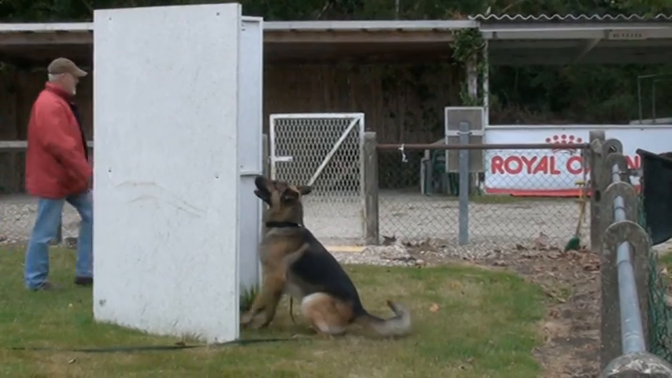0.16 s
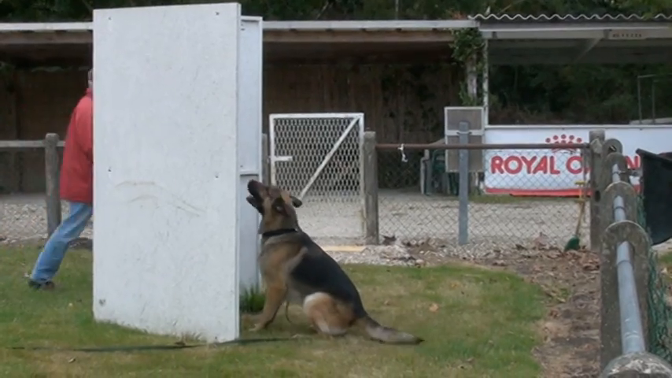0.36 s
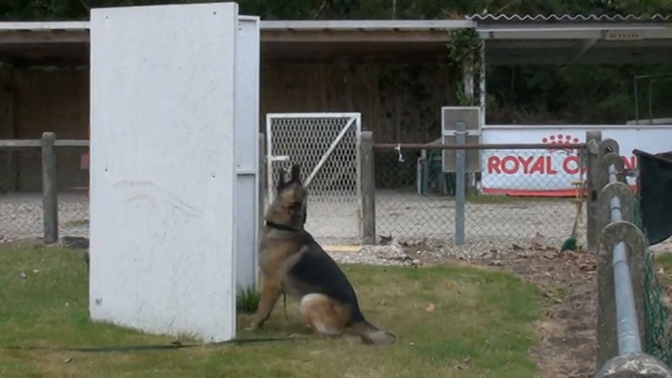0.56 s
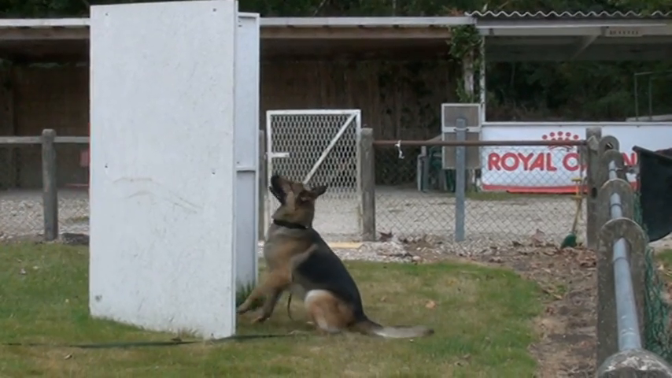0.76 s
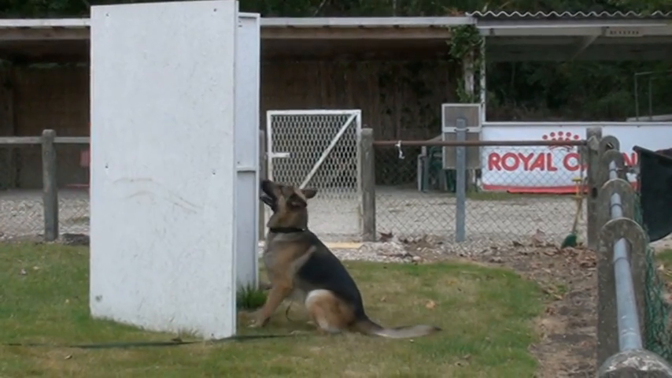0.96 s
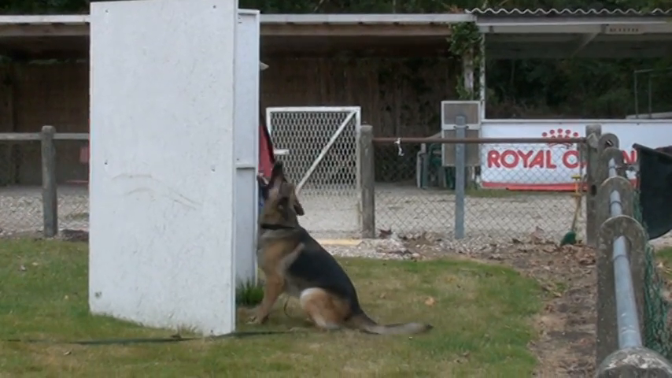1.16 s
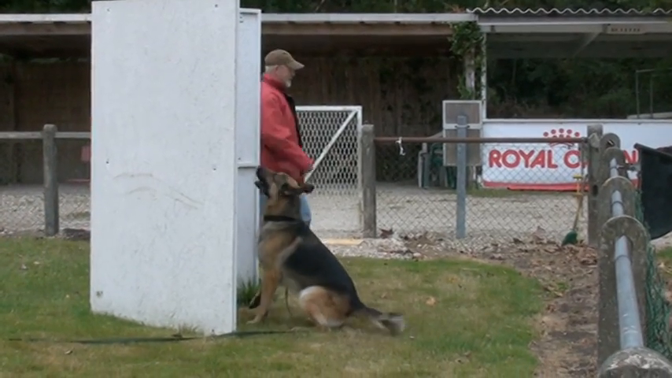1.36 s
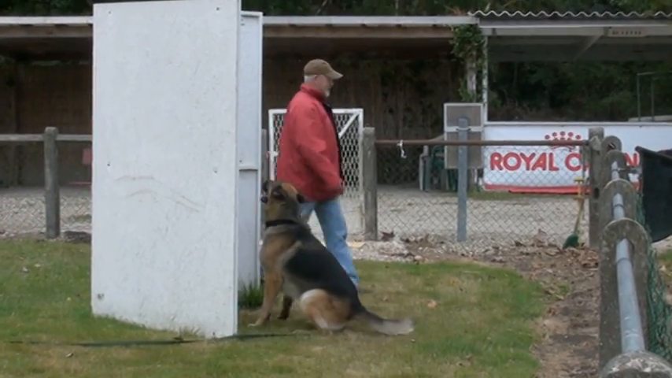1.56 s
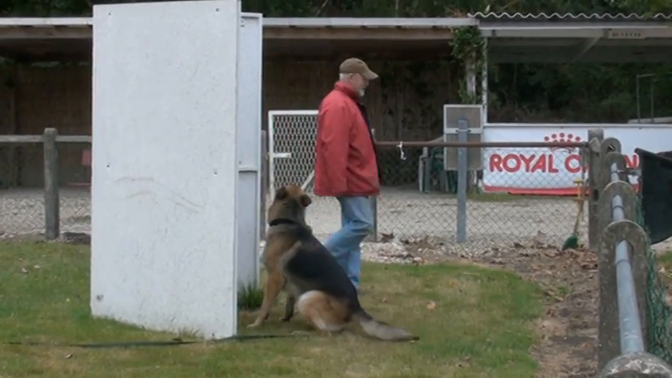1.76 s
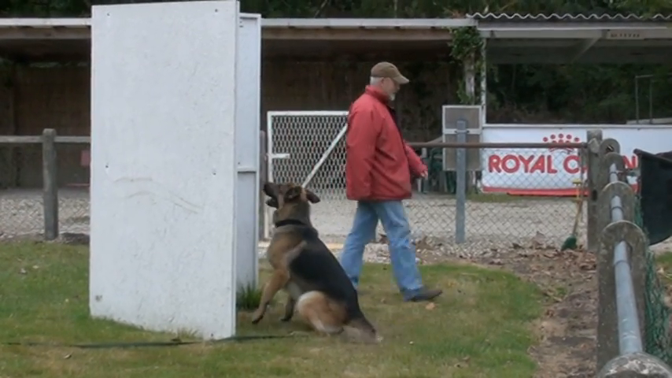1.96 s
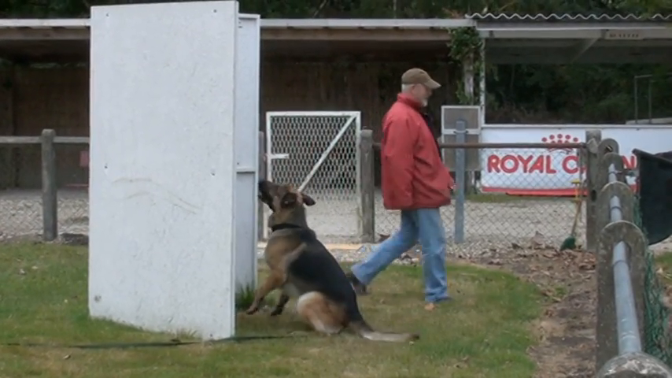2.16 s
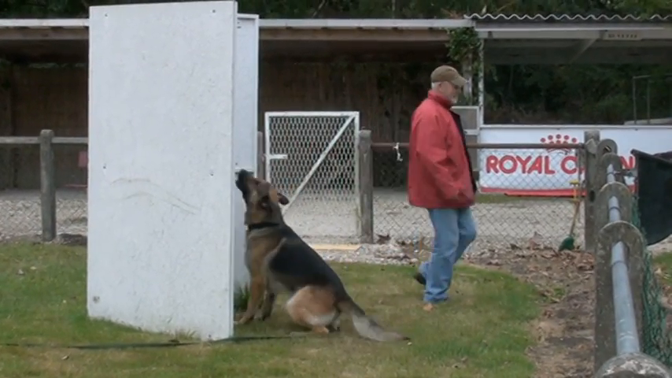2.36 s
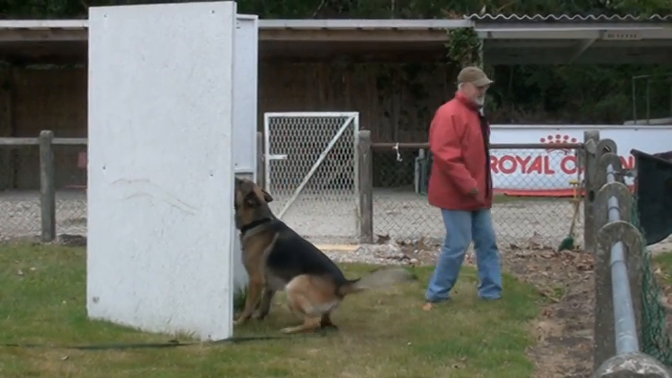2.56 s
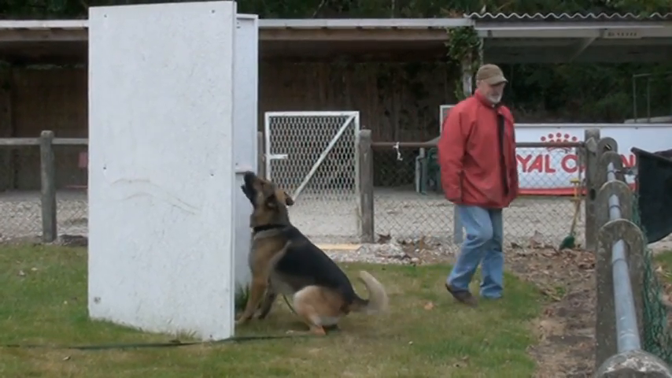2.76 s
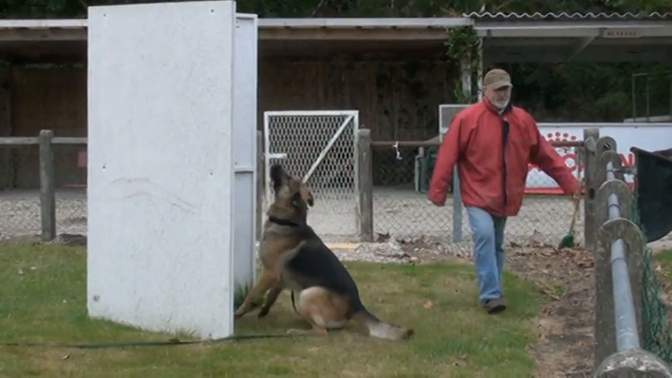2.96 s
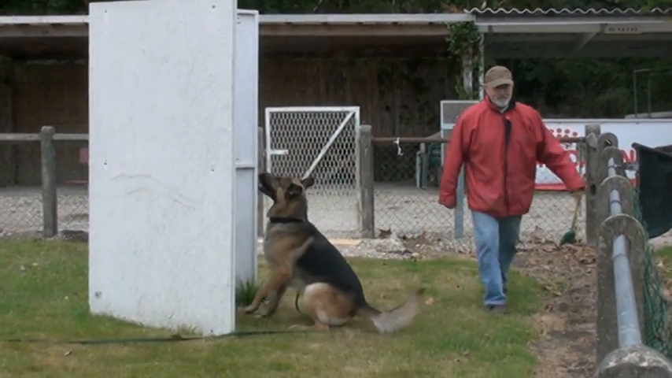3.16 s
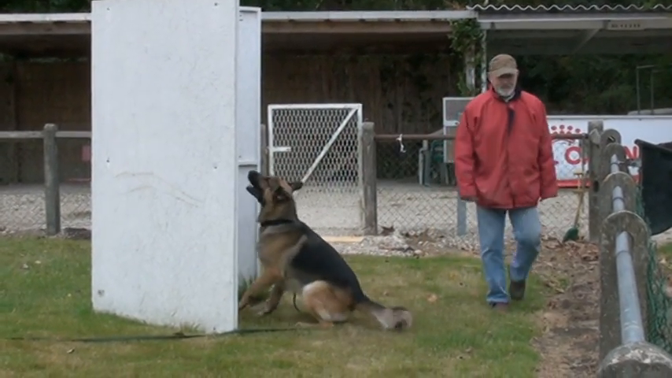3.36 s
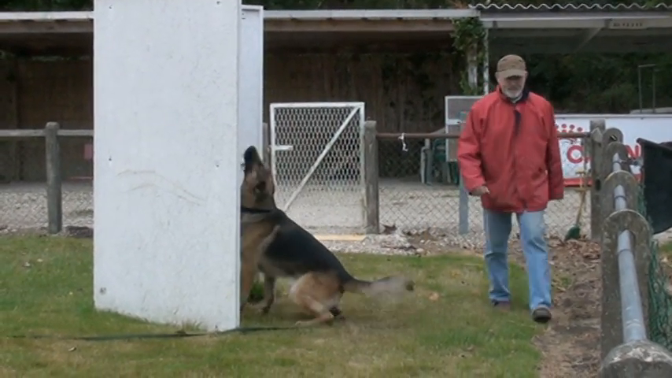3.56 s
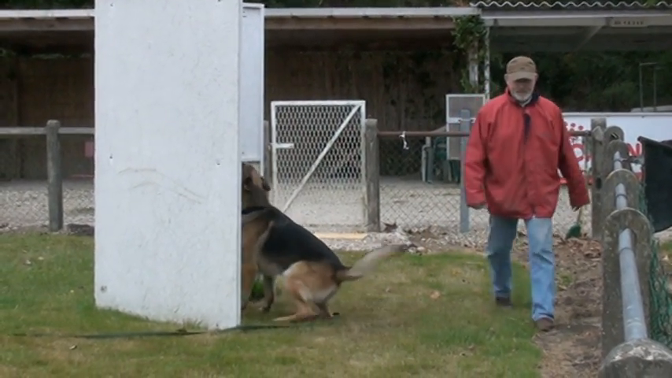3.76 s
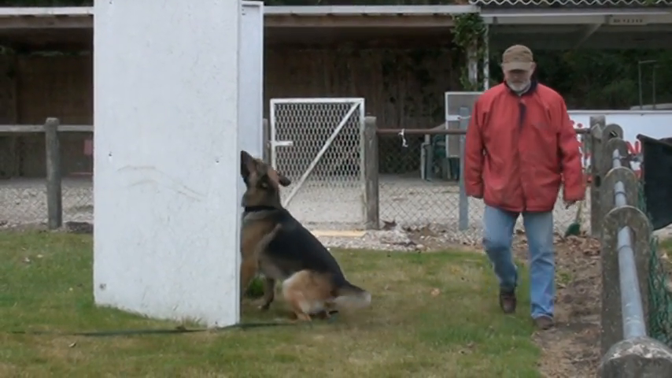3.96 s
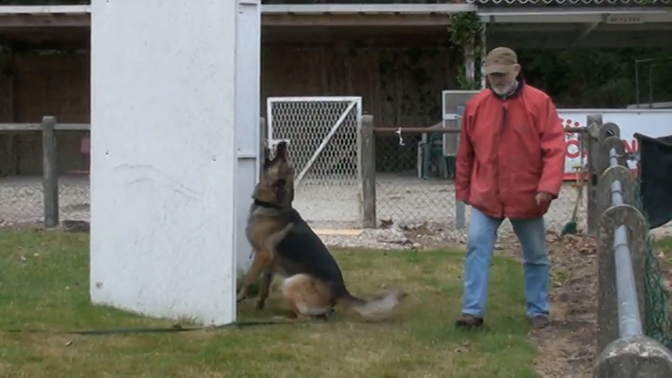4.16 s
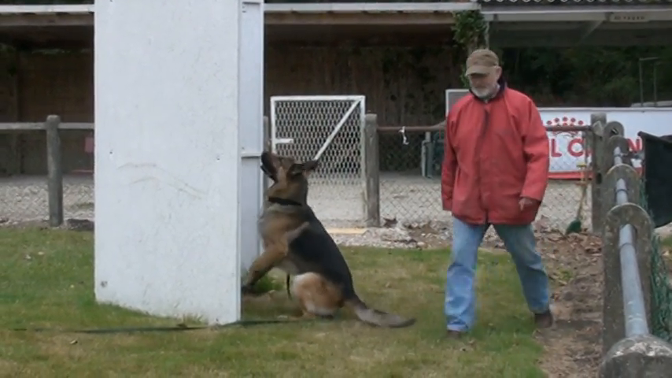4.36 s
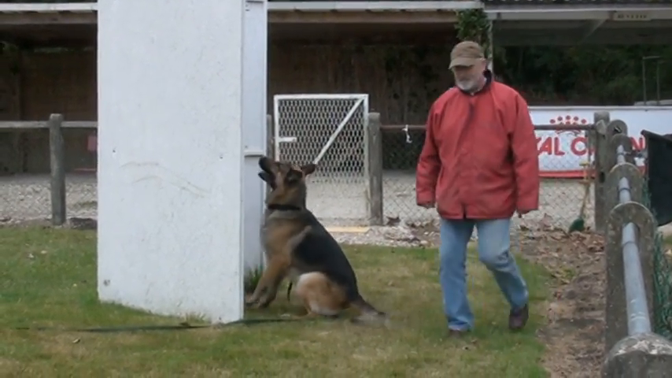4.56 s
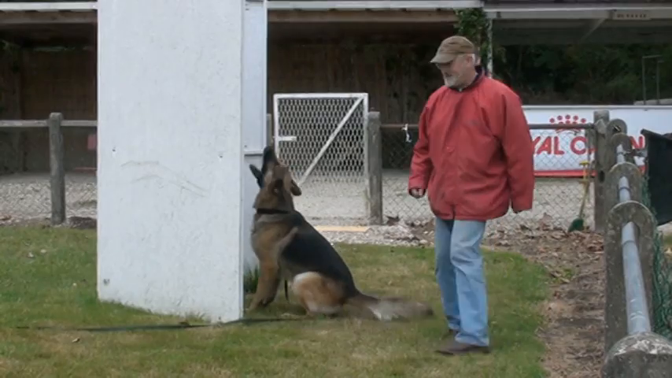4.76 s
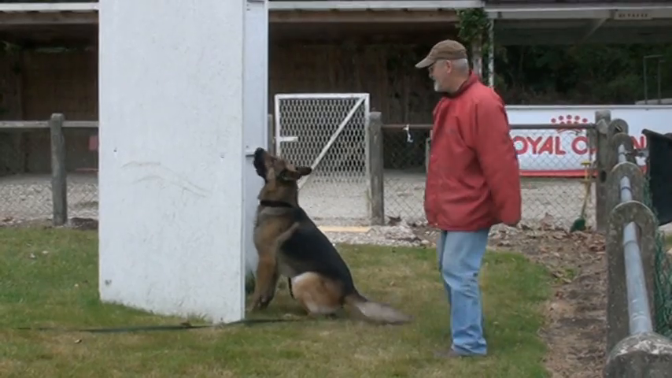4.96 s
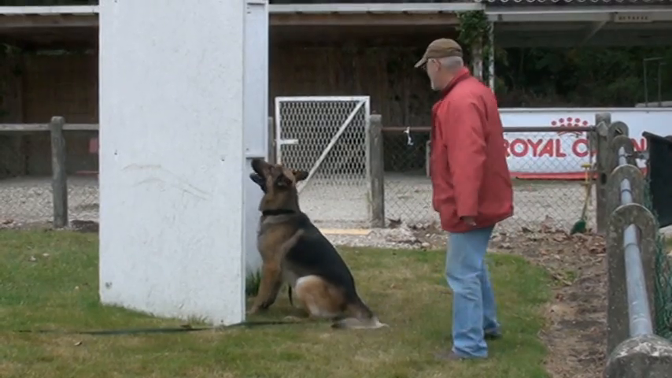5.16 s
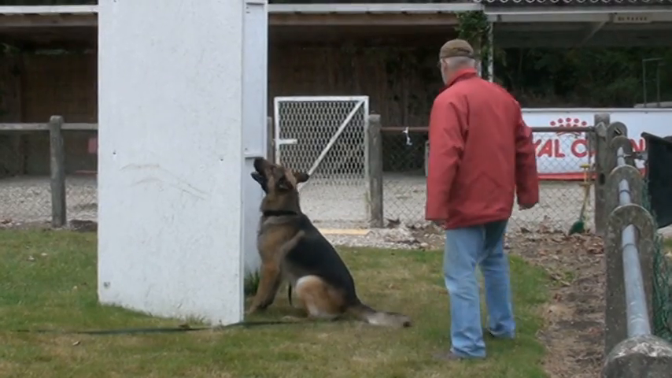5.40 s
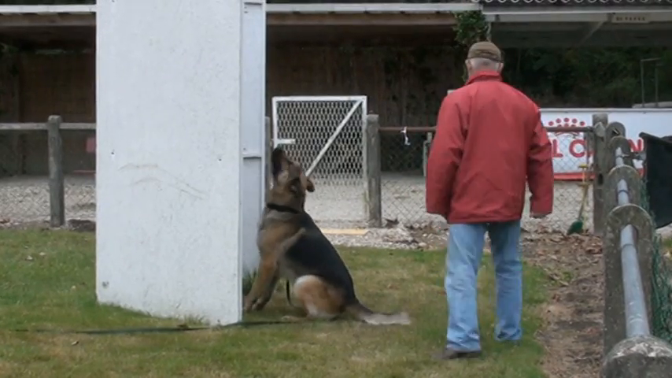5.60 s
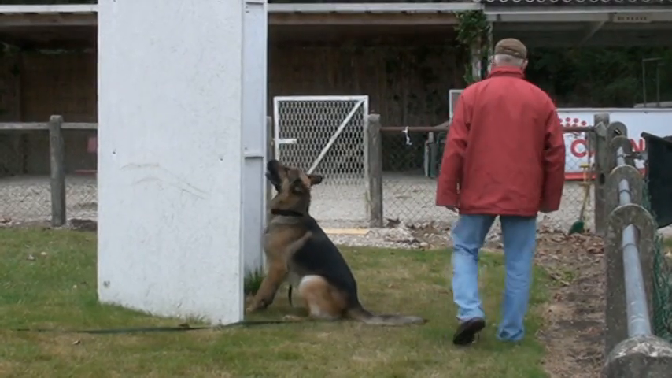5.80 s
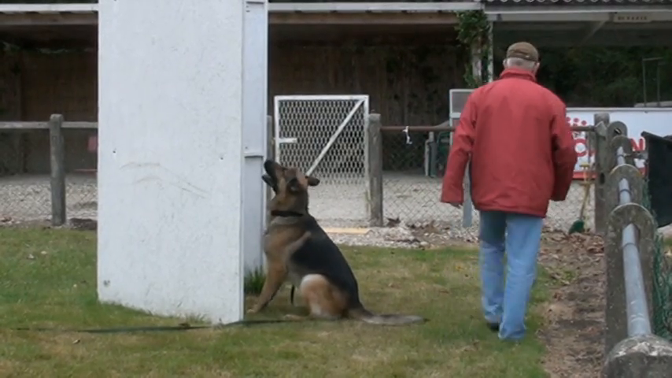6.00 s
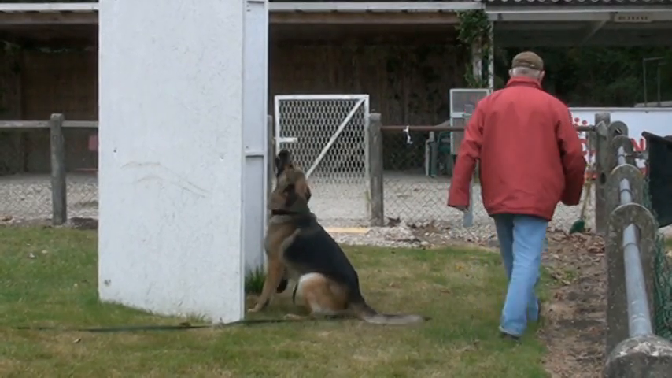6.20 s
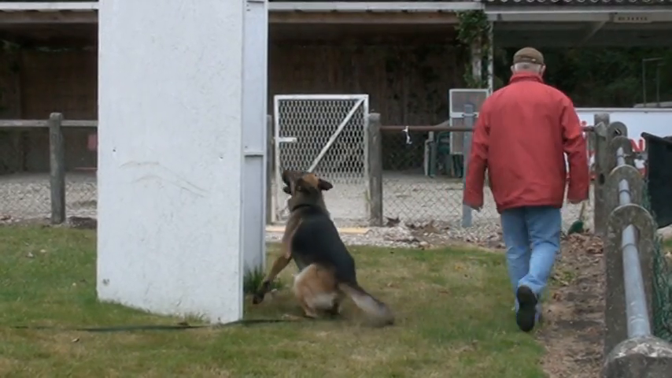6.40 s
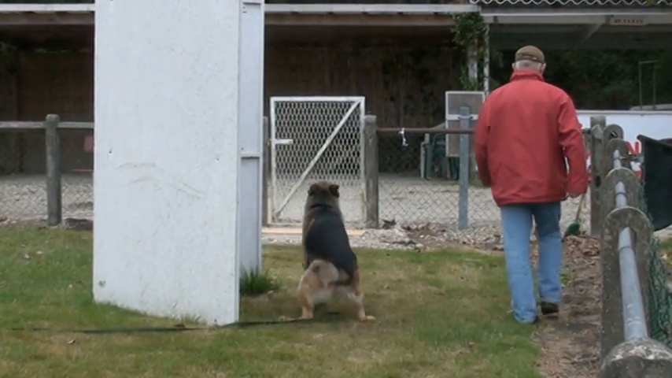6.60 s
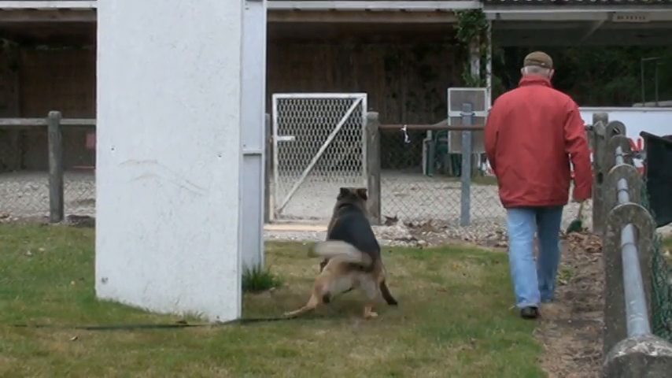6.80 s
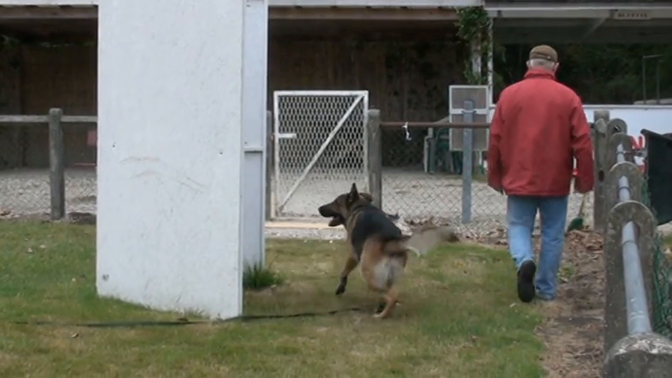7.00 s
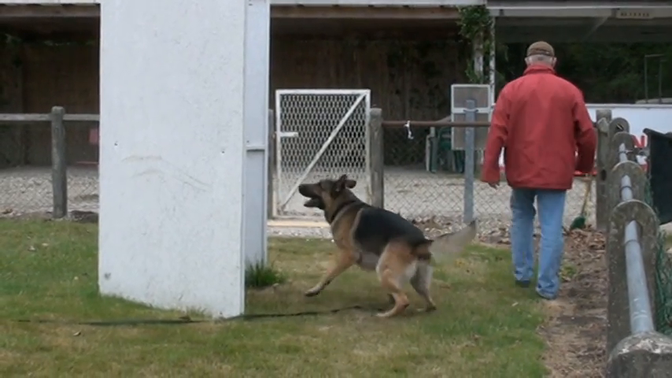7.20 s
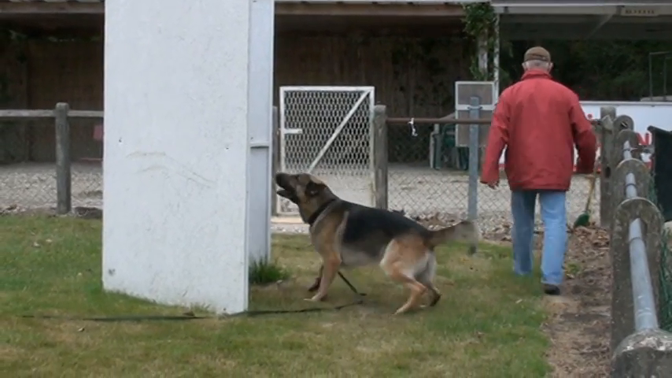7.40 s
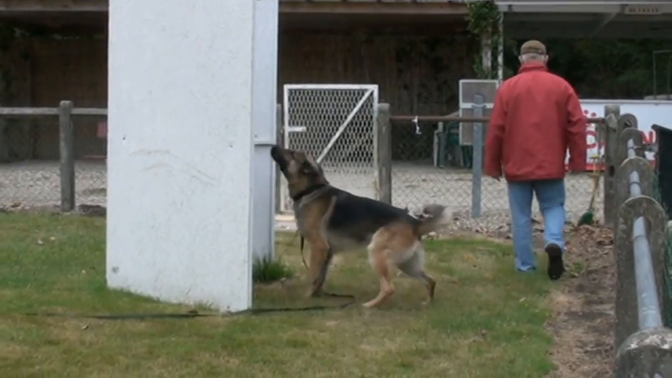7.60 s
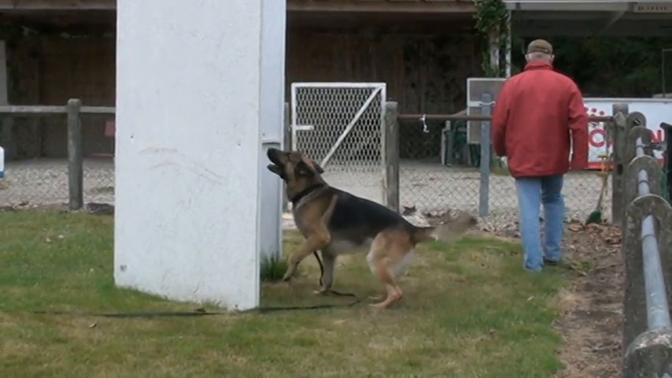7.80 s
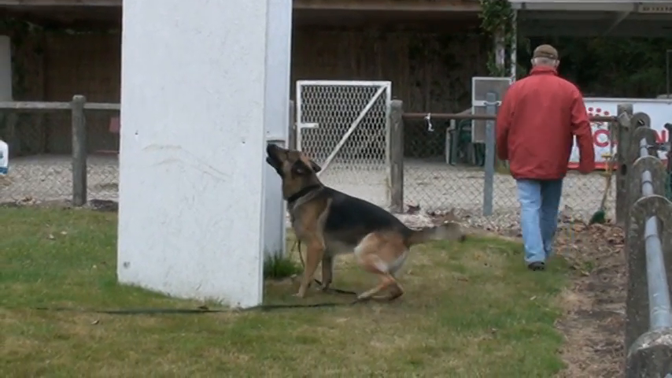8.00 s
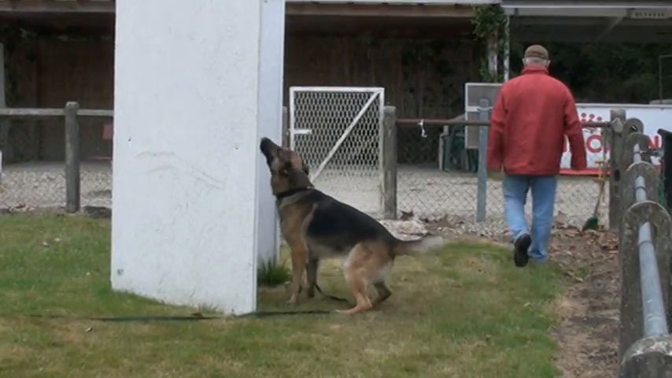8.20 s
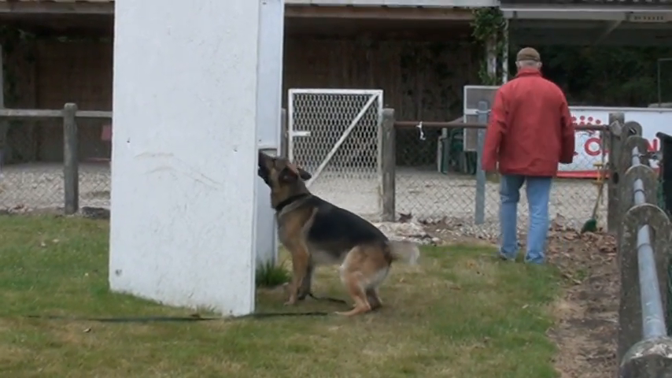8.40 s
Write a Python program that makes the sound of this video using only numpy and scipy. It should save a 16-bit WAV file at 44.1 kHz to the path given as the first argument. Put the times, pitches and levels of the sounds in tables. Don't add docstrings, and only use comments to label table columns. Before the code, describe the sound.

An open field with a low, distant traffic wash. A large dog, some metres from the microphone, barks loudly in single bursts under a tenth of a second each: one already sounding at 0, then near 0.6, 1.2, 2.3, 2.9, 3.6 (weaker and duller), 4.2, 4.9, 5.5, 6.1, 7.5 and 8.1 seconds. Each is rough and mid-pitched, breaking upward then sagging as the mouth shuts, with a sliding undertone, a boxy ring from the wooden screen and quick echoes from shed and fences. A faint hissy intake follows the bark at 4.2. Another dog yaps far off at 1.8, 6.7 and 7.1. A faint engine drone swells around 3.4 and recedes. Close by, soft cloth and grass swishes come and go, clearest near 3.5, 5.9 and 7 to 7.3, with tiny gravel or buckle ticks, mostly after 5 and strongest at 7.6.

```python
import sys
import numpy as np
from scipy import signal
from scipy.io import wavfile
from scipy.ndimage import uniform_filter1d, minimum_filter1d

SR = 44100
rng = np.random.default_rng(int(sys.argv[2]) if len(sys.argv) > 2 else 0)


def bounce(signal):
    frames = np.transpose(np.atleast_2d(signal))
    limited = np.clip(frames, -1, 1)
    pcm = np.round(limited * 32767).astype(np.int16)
    wavfile.write(sys.argv[1], SR, pcm)


def ratio(d):
    e = np.asarray(d, float) / 20
    return 10 ** e


N = 372644


def evened(x):
    return x / np.sqrt(np.mean(abs(x) ** 2) + 1e-20)


def read(points, hz):
    f, value = np.transpose(points)
    return np.interp(np.log(hz + 1), np.log(f + 1), value)


def curve(rows):
    s, value = np.transpose(rows)
    return np.interp(np.arange(N) / SR, s, value)


def add(mix, s, sound):
    part = mix[round(s * SR):][:len(sound)]
    part += sound[:len(part)]


def wobble(size, width_hz):
    *rows, count = np.atleast_1d(size)
    blocks = -(-count // 1024)
    z = rng.standard_normal((*rows, blocks * 2048)).view(complex)
    r = np.exp(-np.pi * width_hz / SR)
    return evened(signal.lfilter([1], [1, -2 * r, r * r], z))[..., :count]


def noise(colour_db, same, lead, patchy_db, flicker_db):
    frames = N // 256 + 5
    a, b, c, d, patches = rng.standard_normal((frames, 513, 5)).T
    flicker = evened(uniform_filter1d(patches[0], size=5))
    patches = uniform_filter1d(patches, size=12, axis=0)
    patches = evened(uniform_filter1d(patches, size=14, axis=1))
    same = np.clip(same, -1, 1)[:, None]
    left = a + 1j * b
    right = same * left + np.sqrt(1 - same ** 2) * (c + 1j * d)
    z = np.array([left, right * np.exp(1j * lead[:, None])])
    z *= ratio(colour_db[:, None] + patchy_db * patches + flicker_db * flicker)
    return evened(signal.istft(z, nperseg=1024, noverlap=768)[1][:, :N])


def dog():
    # start, knee of the build-up, voice break and end, all in seconds.
    bark_times = [(-.083, -.068, -.055, .015), (0.571, .588, .598, .672), (1.185, 1.215, 1.235, 1.3),
                  (2.288, 2.305, 2.324, 2.392), (2.911, 2.936, 2.95, 3.016), (3.57, 3.58, 3.595, 3.638),
                  (4.185, 4.202, 4.218, 4.281), (4.852, 4.866, 4.882, 4.938), (5.479, 5.536, 5.545, 5.626),
                  (6.114, 6.169, 6.19, 6.275), (7.529, 7.543, 7.551, 7.636), (8.131, 8.153, 8.165, 8.25)]
    # level at the knee, at the break, held and as the mouth closes, all in dB.
    efforts = [(-17, -13, -16, -22), (-22, -15.5, -16.5, -21), (-20.5, -15, -15.5, -22),
               (-22, -14.5, -18, -21), (-22, -16, -15, -21), (-28, -18.5, -23, -30), (-24, -14, -17.5, -22),
               (-24, -14.5, -17.5, -18), (-25, -14.5, -16, -18), (-21, -14, -17, -21),
               (-20.5, -16, -16.5, -17.5), (-23, -15, -19, -18.5)]
    # onset, knee, break, top and as the mouth closes, all in Hz.
    pitches = [(322, 316, 302, 343, 338), (365, 400, 317, 362, 340), (288, 284, 292, 357, 335),
               (330, 420, 312, 362, 336), (320, 430, 296, 347, 341), (292, 294, 287, 281, 275),
               (310, 430, 290, 351, 340), (284, 285, 287, 357, 342), (245, 295, 336, 366, 335),
               (235, 296, 312, 363, 300), (332, 345, 303, 354, 322), (245, 300, 338, 371, 346)]
    # roughness 0-1, strength of the ring near 1 kHz 0-1, chest tone in dB, brightness in dB per #
    # octave, hiss in dB.
    colours = [(.3, .1, 3, .5, -39), (.3, 0.36, -3, 1.5, -41), (.22, .15, -4, .5, -38),
               (.18, .35, 4, -.5, -40), (.35, .85, 3, .5, -41), (.3, .2, .5, 1.5, -34),
               (.33, .3, 2, 1.5, -39), (.22, .3, 1.5, .2, -39), (.17, .05, -6, -1.5, -41),
               (.08, .2, -4, .2, -41), (.3, .1, 1.5, -3, -41), (.22, .5, 4.5, -2, -41.5)]
    # start in seconds, opening, middle and closing level in dB, closing Hz.
    slides = [(-.045, -18, -22, -16, 467.7), (.604, -23, -26.5, -15, 440), (1.24, -14, -36, -30, 472),
              (2.335, -46, -23, -24, 492), (2.952, -27, -35, -16.5, 455), (3.571, -22, -13.5, -13.5, 470),
              (4.218, -28, -34, -13.5, 468.3), (4.885, -31, -27.5, -24.5, 455),
              (5.535, -28, -37, -25.5, 547), (6.198, -18, -45, -26, 517), (7.59, -35.5, -45, -42, 550),
              (8.19, -38, -39, -29, 512)]
    lead_s = .2
    lead = round(lead_s * SR)
    dry = np.zeros(N + lead)
    for timing, effort, pitch, colour, under in zip(bark_times, efforts, pitches, colours, slides):
        start, *_, end = timing
        rough, ring, chest_db, bright_db, hiss_db = colour
        course = gesture(timing, effort, pitch, rough, ring, bright_db)
        add(dry, start + lead_s, bark(course, chest_db, hiss_db))
        add(dry, under[0] - .004 + lead_s, slide(fall(end, *under)))
    dry = ratio(-3.5) * booth(dry)
    late = signal.lfilter(*signal.iirpeak(330, 1.6, fs=SR), dry)
    peak = signal.iirpeak(560, 1.5, fs=SR)
    early = signal.lfilter(*peak, signal.lfilter(*peak, dry))
    early = np.gradient(early) * SR / (2 * np.pi * 540)
    direct = dry * ratio([[.1], [-.1]]) + late * [[-.15], [.15]] + early * [[.17], [-.17]]
    return (direct + yard(dry))[:, lead:]


def gesture(timing, effort, pitch, rough, ring, bright_db):
    extra_rough = [.3, .15, .15, 0., 0.01, 0.0041, 0.3, 0.45]
    mouth_opening = [.88, .96, 0.88, .91, .98, 1.01, .8, .72]
    extra_bright_db = [-1, 2, 1.2, 1, 2.5, 3.5, 5, 0]
    ring_share = [.9, 1.1, .6, .6, .95, .9, 1.1, .5]
    start, knee, crack, end = timing
    knee_db, crack_db, held_db, closing_db = effort
    onset_hz, knee_hz, crack_hz, top_hz, closing_hz = pitch
    flip = min(knee + .005, (knee + crack) / 2)
    jump = crack + .009
    held = end - crack
    s = [start, knee, flip, crack, jump, crack + 0.43 * held, crack + .8 * held, end]
    onset_db = knee_db - 3 - 400 * (knee - start)
    flip_db = knee_db + .7 * (crack_db - knee_db)
    effort_db = [onset_db, knee_db, flip_db, crack_db, held_db, held_db, closing_db, closing_db - 9]
    flip_hz = min(knee_hz, .96 * crack_hz)
    hz = [onset_hz, knee_hz, flip_hz, crack_hz, .965 * top_hz, top_hz, closing_hz, .91 * closing_hz]
    return np.transpose([s, effort_db, hz, rough + np.array(extra_rough), max(ring, 0) * np.array(ring_share),
                         mouth_opening, bright_db + np.array(extra_bright_db)])


def bark(rows, chest_db, hiss_db):
    # Hz, width in Hz, level in dB, how much the mouth moves it.
    throat = [(335, 91, -10.5, 0.36), (724, 222, 2.5, 0.95), (1016, 245, -1, 0.3), (1427, 287, -8, 0.078),
              (1875, 335, -8.5, 0.46), (2535, 540, -30, 0.033)]
    # Hz, width in Hz, level in dB.
    pant = [(3466, 2660, 1), (4880, 980, -5), (5920, 940, -2), (7870, 1200, -8), (10200, 1900, -13),
            (11300, 1500, -17)]
    s, *columns = np.transpose(rows)
    t = np.arange(s[0], s[-1] + .012, 1 / SR)
    effort_db, hz, rough, ring, mouth, bright_db = (np.interp(t, s, c) for c in columns)
    rough = np.clip(rough, 0, 1)
    jitter = 0.046 * rough * wobble(len(t), width_hz=174).real
    turns = np.cumsum(hz * (1 + jitter)) / SR
    multiple = np.arange(1, 19)[:, None] / 2
    f = multiple * hz
    weight = np.where(multiple % 1, .22, 1) * ratio(bright_db * np.log2(f / 700))
    weight = weight * sum((-1) ** k * ratio(db) / (1 + 2j * (f - c * mouth ** move) / width) ** 2
                          for k, (c, width, db, move) in enumerate(throat))
    weight = weight * (0.74 + 2.86 * ring / (1 + ((f - 1045) / 95) ** 2))
    weight = weight * f ** 4 / (f ** 4 + 207.0 ** 4)
    weight = weight * ratio(chest_db * (multiple <= 1))
    blur = np.clip(rough * np.where(multiple % 1, 2.5, 1) * (multiple / 3) ** 0.65, 0, 1)
    smear = np.sqrt(1 - blur ** 2) + blur * wobble(f.shape, width_hz=230)
    swell = wobble(f[:, ::32].shape, width_hz=30 * 32).real.repeat(32, axis=1)[:, :len(t)]
    smear = smear * ratio(3.3 * uniform_filter1d(swell, size=32))
    voice = (weight * smear * np.exp(2j * np.pi * multiple * turns)).real.sum(0)
    voice /= np.sqrt((abs(weight) ** 2).sum(0) / 2)
    drift = np.cumsum((hz / 330) ** .3) / SR
    air = sum(ratio(db + 6 * wobble(len(t), width_hz=55).real)
              * (wobble(len(t), width) * np.exp(2j * np.pi * c * drift)).real
              for c, width, db in pant)
    puffs = .5 + np.exp(-(turns % 1) / 0.3)
    hiss = ratio(hiss_db + 2.5 + 0.53 * effort_db) * evened(air * puffs)
    fade = np.clip((t[-1] - t) / 0.0096, 0, 1) * np.clip((t - t[0]) / 0.0015, 0, 1)
    return fade * (ratio(effort_db) * voice + hiss)


def fall(end, start, opening_db, middle_db, closing_db, closing_hz):
    start_hz, overhang_s = 581.6, .024
    s = start + (end + overhang_s - start) * np.array([0, .35, .64, 1])
    middle_hz = start_hz + .5 * (closing_hz - start_hz)
    hz = [start_hz, middle_hz, closing_hz, .68 * closing_hz]
    return np.transpose([s, hz, [opening_db, middle_db, closing_db, closing_db - 29]])


def slide(rows):
    # multiple of the pitch, level in dB.
    slide_partials = [(.5, -24.5), (1, -1.5), (2, -14), (3, -20)]
    s, hz, db = np.transpose(rows)
    t = np.arange(s[0] - .004, s[-1] + 0.0087, 1 / SR)
    turns = np.cumsum(np.interp(t, s, hz)) / SR
    tone = sum(ratio(over_db) * ((1 + 0.52 * k * wobble(len(t), width_hz=88)) * np.exp(2j * np.pi * k * turns)).real
               for k, over_db in slide_partials)
    return ratio(np.interp(t, s, db) + 0.5) * tone * signal.windows.tukey(len(t), .25)


def booth(x):
    # Hz, width in Hz, level in dB.
    corner_modes = [(346.7, 23, -0.5), (581, 42, 2.5), (733, 69, 1.5), (1030, 77, -11), (1456, 45, -5.5),
                    (1796, 39, -35)]
    out = x.copy()
    for hz, width, db in corner_modes:
        pole = np.exp((2j * hz - width) * np.pi / SR)
        gain = 2 * ratio(db) * (1 - abs(pole))
        out += signal.lfilter([gain, -gain * pole.real], [1, -2 * pole.real, abs(pole) ** 2], x)
    return out


def yard(x):
    # delay in seconds, level in dB, left over right in dB.
    echoes = [(.021, -18.5, 9), (.043, -24, -17), (.078, -21, 1), (.125, -32, -15), (0.201, -37, 7),
              (.392, -42, -5)]
    # Hz, time to fall 60 dB in seconds.
    decay_times = [(250, .3), (580, 0.94), (760, 0.45), (1060, 0.93), (1500, 0.86), (2200, .4), (4000, 0.3),
                   (9000, 0.34)]
    taps = np.zeros((2, SR))
    at = np.arange(900, SR - 20, 20) + rng.integers(0, 20, (2, (SR - 901) // 20))
    sign = rng.choice([-1., 1.], at.shape)
    np.put_along_axis(taps, at, sign, 1)
    hz, t, z = signal.stft(taps + 0.8 * taps[::-1], SR, nperseg=256)
    decay_db = -60 * t / read(decay_times, hz)[:, None]
    far_db = -9.0 + 0.25 * decay_db
    tail = signal.istft(z * (ratio(decay_db) + ratio(far_db)), SR, nperseg=256)[1]
    tail *= ratio(-28.5) / np.linalg.norm(tail[0])
    for delay, db, pan_db in echoes:
        tail[:, round(delay * SR)] += ratio(db + np.array([.5, -.5]) * pan_db)
    dull = signal.lfilter(*signal.butter(1, 6000, fs=SR), x)
    return signal.oaconvolve(dull[None], tail, axes=1)[:, :len(x)]


def gasp():
    # start in seconds, level in dB, Hz, length in seconds.
    intake = (4.285, -52, 5300, .09)
    s, db, hz, length = intake
    t = np.arange(0, length, 1 / SR)
    hiss = (wobble(len(t), width_hz=1500) * np.exp(2j * np.pi * hz * t)).real
    out = np.zeros(N)
    add(out, s, ratio(db) * np.hanning(len(t)) * hiss)
    return out


def walker():
    # middle in seconds, level in dB, length in seconds.
    swishes = [(.2, -76, 0.9), (1.82, -69, 0.25), (2.2, -74, 0.45), (2.8, -74, 0.156), (3.46, -63.5, .2),
               (3.715, -71, .12), (4.38, -74, .15), (4.53, -74.5, .073), (4.784, -69, 0.22),
               (5.883, -63.5, 0.33), (6.443, -67, .1), (6.927, -63.5, 0.089), (7.147, -69, .1),
               (7.255, -63, 0.27), (7.797, -71.5, .18), (8.3, -69.5, .36), (8.426, -66.5, .067)]
    # Hz, level in dB per Hz.
    swish_colour = [(1000, -25.5), (3000, 5), (6000, 8), (9000, 8.5), (12000, 5.5), (16000, -18)]
    # start in seconds, peak level in dB.
    tick_times = [(0.6525, -46), (3.7897, -58), (4.194, -55), (5.042, -48), (5.6386, -49), (6.588, -52),
                  (6.916, -45), (7.0604, -50), (7.1514, -52.5), (7.643, -41), (7.756, -48.5)]
    hz = np.fft.rfftfreq(1024, 1 / SR)
    grains = rng.exponential(1, N // 40 + 1)
    grains = ratio(2.2 * uniform_filter1d(grains, size=2).repeat(40)[:N])
    same = np.full(len(hz), .92)
    rustle = noise(read(swish_colour, hz), same, np.zeros(len(hz)), patchy_db=1., flicker_db=1.)
    rustle = evened(grains * rustle)
    now = np.arange(0, N, 64) / SR
    strokes = sum(ratio(db) * np.exp(-(2.3 * (now - s) / length) ** 2) for s, db, length in swishes)
    ticks, t = np.zeros(N), np.arange(300) / SR
    for s, db in tick_times:
        click = np.sin(2 * np.pi * 7000 * t) + .5 * rng.standard_normal(len(t))
        add(ticks, s, ratio(db - 60 * t / 0.0019) * click)
    return np.interp(np.arange(N) / SR, now, strokes) * rustle + ticks


def far_dog():
    # start in seconds, level in dB, Hz, length in seconds.
    yaps = [
        (1.784, -50.5, 1156, 0.092),
        (6.658, -48.5, 1070, 0.09),
        (7.065, -50.5, 1165, 0.092),
    ]
    out = np.zeros(N)
    for s, db, hz, length in yaps:
        t = np.arange(0, length, 1 / SR)
        arch = hz * (.94 + .08 * np.sin(np.pi * t / length))
        tone = (.5 + wobble(len(t), width_hz=210)) * np.exp(2j * np.pi * np.cumsum(arch) / SR)
        add(out, s, ratio(db) * tone.real * signal.windows.tukey(len(t), .6))
    return out


def traffic():
    # Hz, level in dB per Hz.
    wash_colour = [(25, -19), (65, 0.5), (150, -7.5), (300, -6.5), (550, -8), (1050, -6.5), (1600, -10),
                   (2500, -15), (4000, -17.5), (6000, -21.5), (8500, -28), (11000, -35.5), (14000, -41.5),
                   (16500, -41)]
    # time in seconds, level of the wash in dB.
    wash_db = [(0., -48), (.3, -49.5), (3.3, -51.5), (5.7, -51), (6.8, -51.5), (8.45, -50.5)]
    # Hz, likeness of left and right.
    likeness = [(60, 0.98), (150, 0.94), (400, 0.98), (1000, 0.7), (2500, 0.76), (5000, 0.81), (9000, 0.74),
                (12000, 0.9), (14500, 0.99)]
    # Hz, phase between the channels in radians.
    side_phase = [(100, 0.083), (500, -0.5), (1600, -0.21), (5000, -0.053), (11000, .2)]
    # time in seconds, level in dB.
    engine_db = [(0, -70), (1.5, -70), (2.2, -57.5), (3.4, -49), (3.8, -58), (4.6, -56), (5.4, -65.5),
                 (8.45, -63)]
    hz = np.fft.rfftfreq(1024, 1 / SR)
    wash = noise(read(wash_colour, hz), read(likeness, hz), read(side_phase, hz), patchy_db=1.0, flicker_db=1.0)
    engine_hz = 106.7
    note = (0.6 + .5 * wobble(N, width_hz=15)) * np.exp(2j * np.pi * engine_hz * np.arange(N) / SR)
    return ratio(curve(wash_db) + 1.0) * wash + ratio(curve(engine_db) - 1.5) * note.real


def scene():
    return dog() + gasp() + walker() + far_dog() + traffic()


def limiter(x):
    ceiling_db = -8.5
    peak_db = 20 * np.log10(-minimum_filter1d(-abs(x).max(0), size=300) + 1e-9)
    over_db = uniform_filter1d(np.maximum(peak_db - ceiling_db, 0), size=200)
    return x / ratio(.9 * over_db)


def scan_whine():
    whine_hz, whine_db = 15625, -87
    unsteady = 1 + .35 * wobble(N, width_hz=70)
    return ratio(whine_db) * (unsteady * np.exp(2j * np.pi * whine_hz * np.arange(N) / SR)).real


def low_pass(x):
    return signal.sosfilt(signal.butter(12, 16516, fs=SR, output="sos"), x)


def record(dry):
    return low_pass(limiter(dry) + scan_whine())


dry = scene()
out = record(dry)
bounce(out)
```